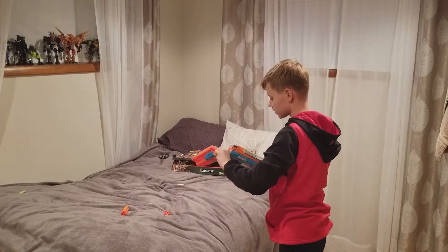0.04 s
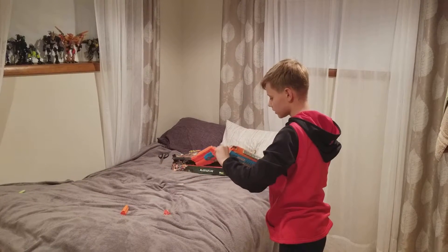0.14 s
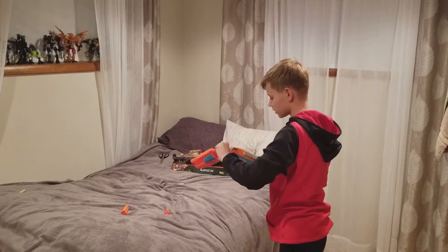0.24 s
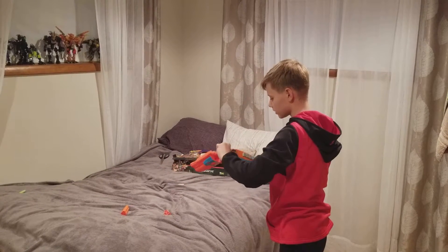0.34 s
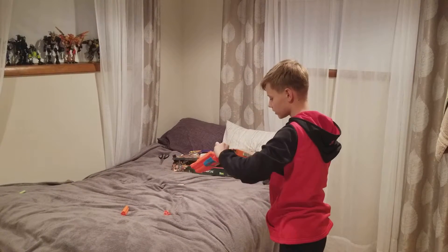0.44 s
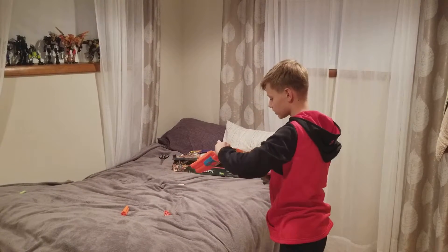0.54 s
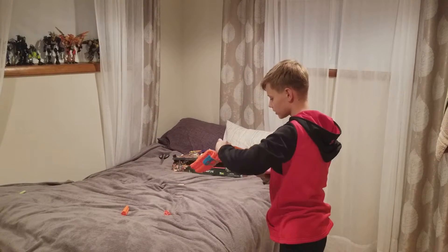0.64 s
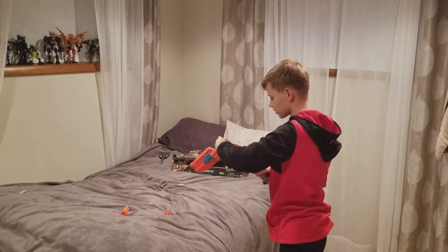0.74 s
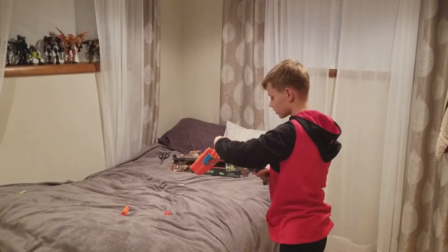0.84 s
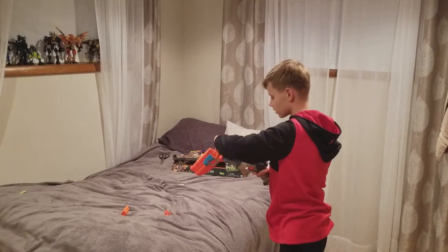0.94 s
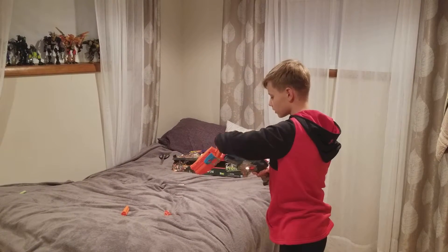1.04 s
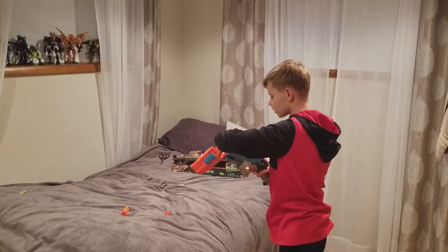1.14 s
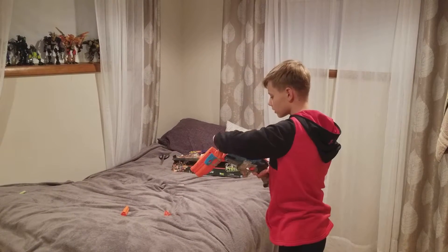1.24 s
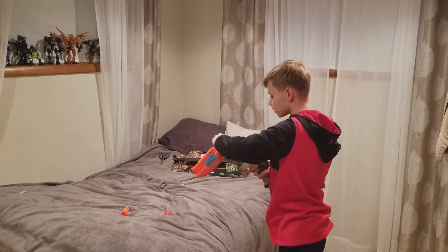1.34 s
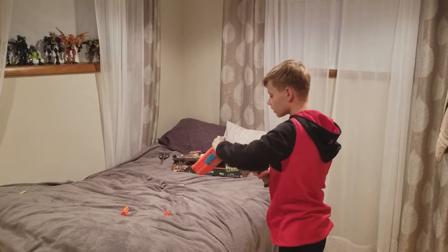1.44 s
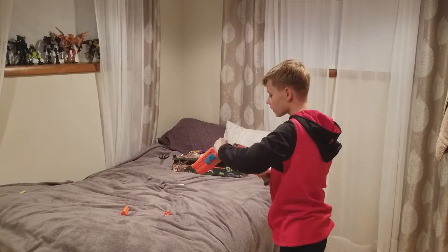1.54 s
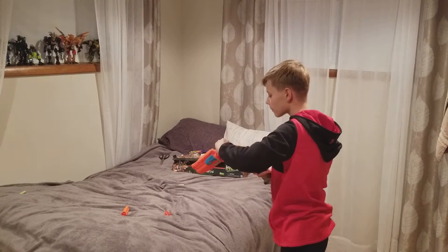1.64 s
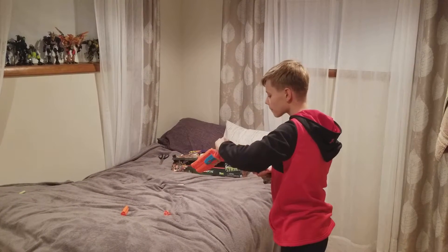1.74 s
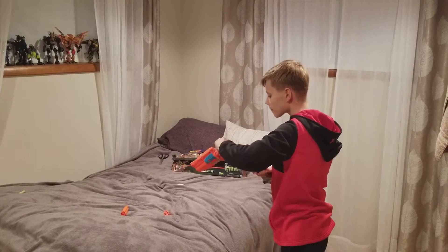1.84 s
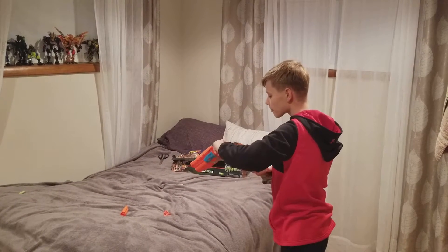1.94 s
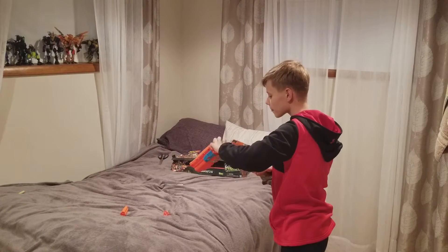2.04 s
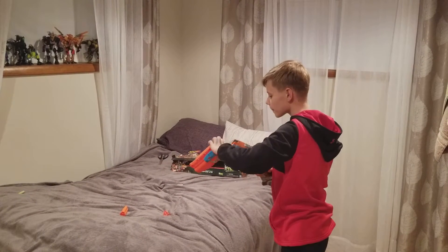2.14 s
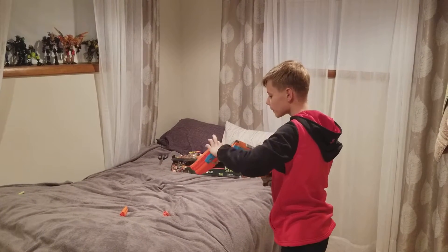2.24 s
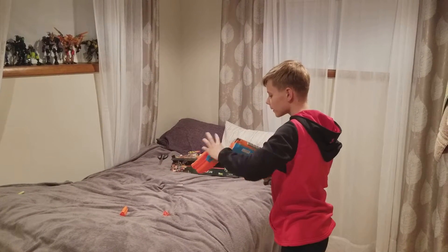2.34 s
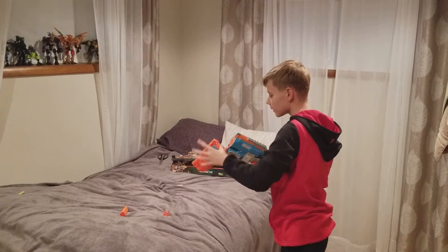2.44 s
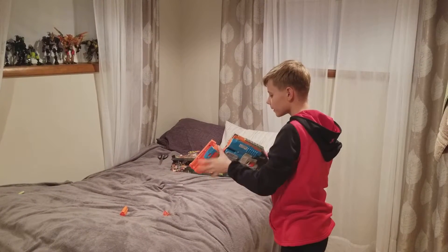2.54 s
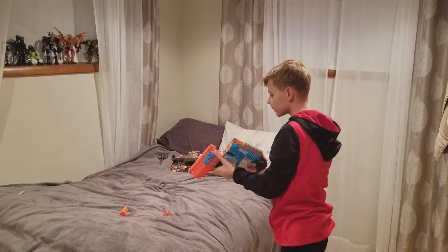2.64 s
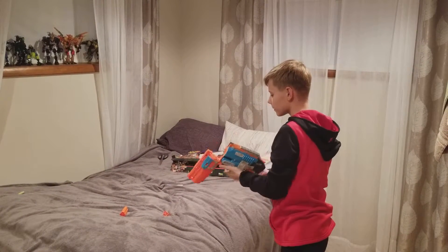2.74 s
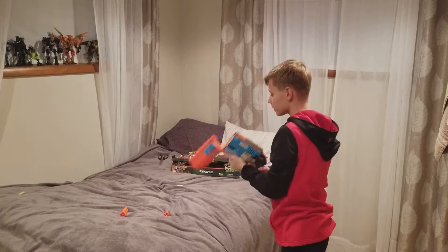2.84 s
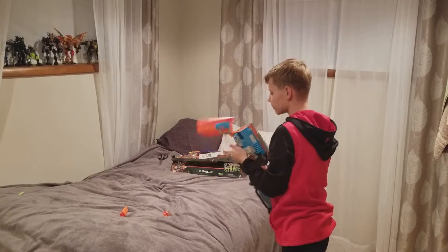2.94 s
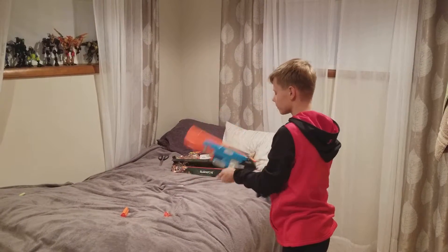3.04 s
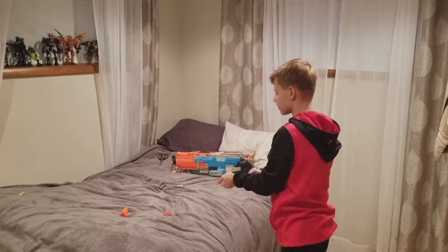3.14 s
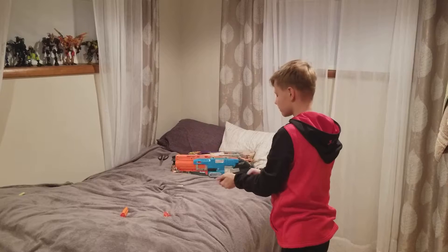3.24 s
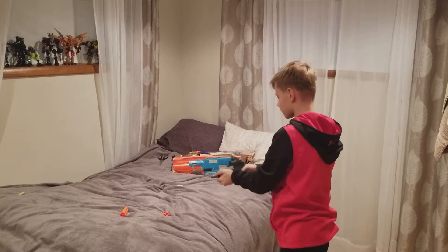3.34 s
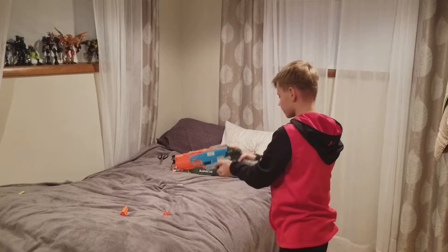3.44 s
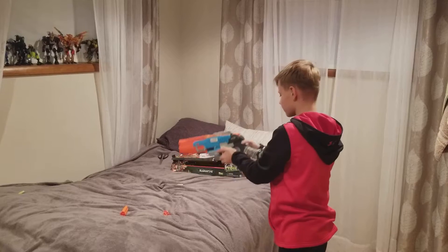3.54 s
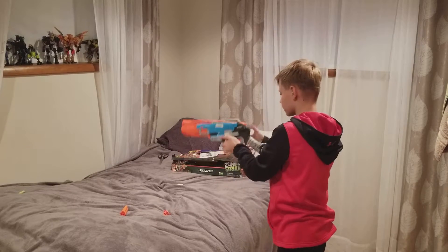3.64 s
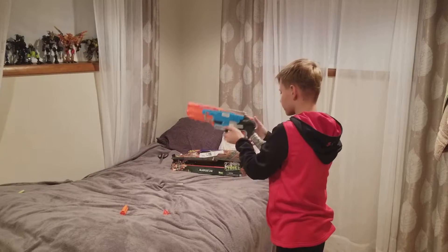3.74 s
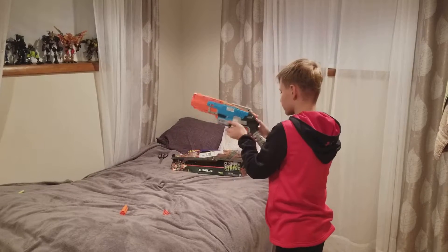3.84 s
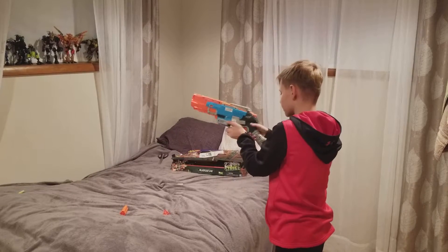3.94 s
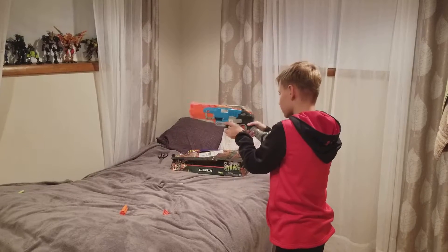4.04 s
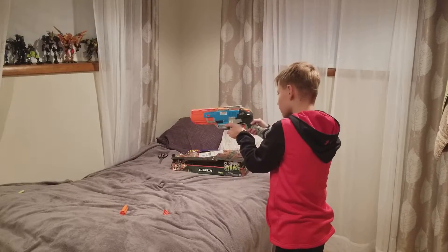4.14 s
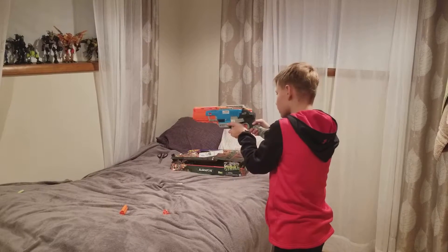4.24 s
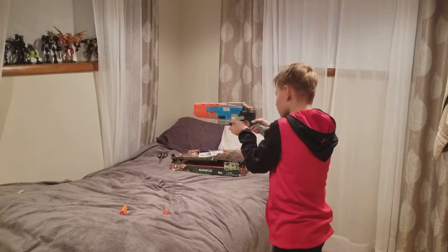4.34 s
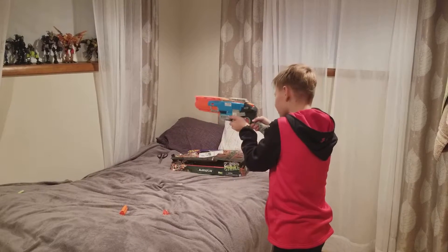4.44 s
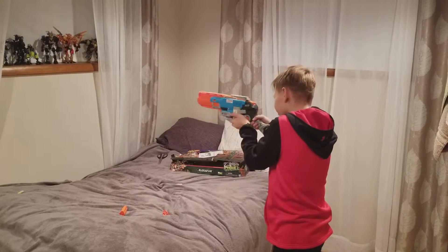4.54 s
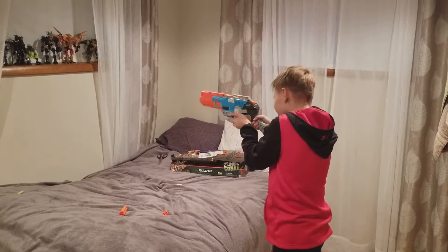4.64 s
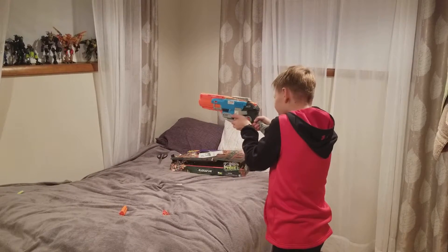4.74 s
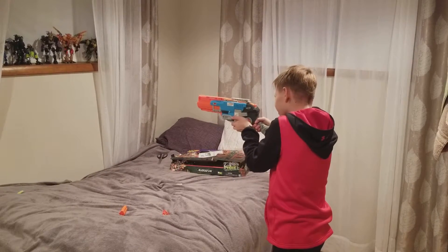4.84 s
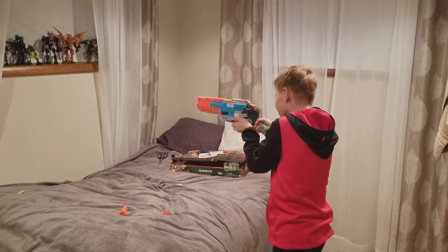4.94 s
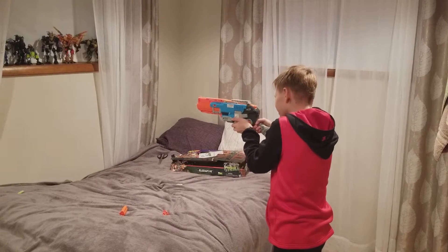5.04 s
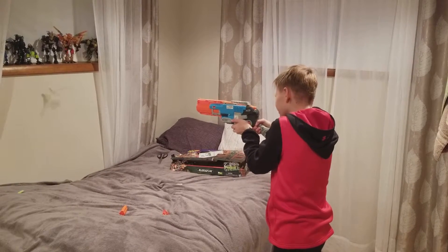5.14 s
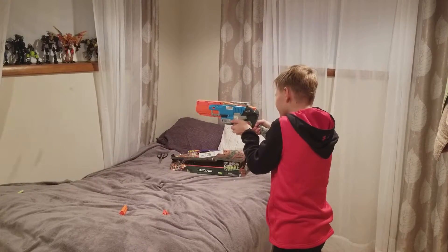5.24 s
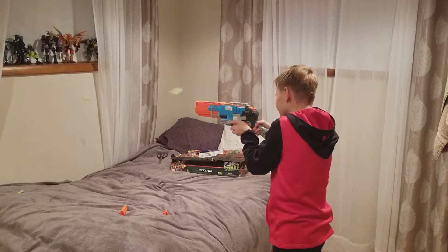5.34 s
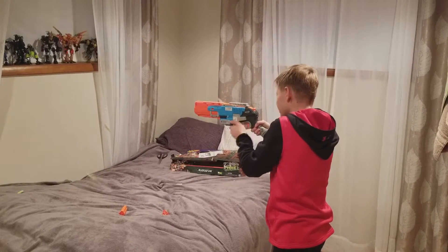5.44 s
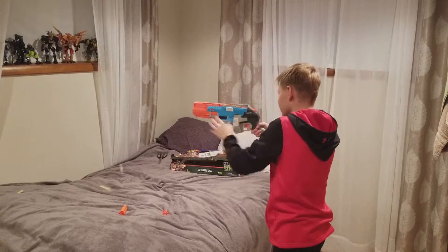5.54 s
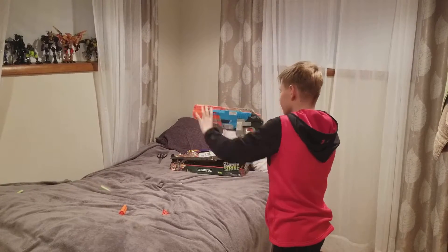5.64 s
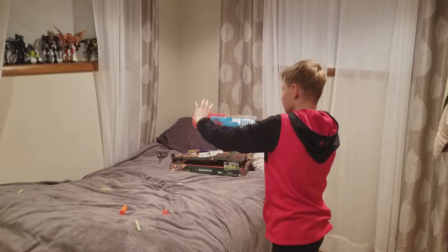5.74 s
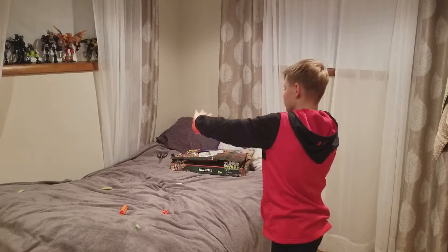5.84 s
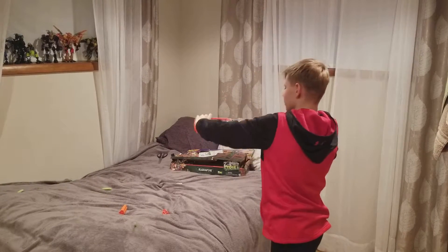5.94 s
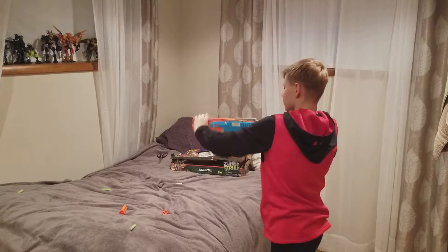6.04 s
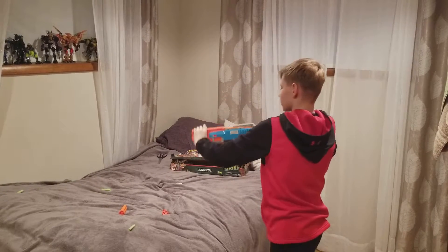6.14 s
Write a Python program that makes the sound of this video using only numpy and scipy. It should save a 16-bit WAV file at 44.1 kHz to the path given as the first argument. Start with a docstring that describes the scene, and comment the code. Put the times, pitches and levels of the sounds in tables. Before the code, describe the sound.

A plastic toy blaster is loaded in a small bedroom, heard from a few steps away. For the first half second there are light clicks, short scrapes and a tiny squeak. Sparse ticks and double clicks follow from about 1.2 seconds, growing busier from 1.8, with sharper ones near 2.3. At 2.9 a quick rising rasp ends in a loud, hollow plastic snap at 3.0 as the slide slams home, the spring ringing faintly. A few soft clicks come between 3.8 and 4.4. At about 5.1 the blaster fires with a loud snap, a low pop of air and a brief plunger rattle. The dart smacks the wall almost at once and bounces lightly near 5.3. Faint rubbing follows, then a small click at 5.9. The blows have short room reverberation, over a faint low house rumble and thin hiss.

```python
"""In a small furnished bedroom, a spring-powered toy blaster is loaded, cocked and fired.
Impacts and stick-slip friction excite the resonances of its hollow plastic shell: parts click and rasp,
the slide slams home and the coil spring rings faintly. On release the plunger drives out a pop of air,
and the dart smacks the far wall and bounces once. Short reverberation follows the blows,
over a low house rumble and a thin hiss."""
import sys
import numpy as np
from scipy import signal
from scipy.fft import rfft, irfft
from scipy.io import wavfile
from scipy.ndimage import uniform_filter1d

SR = 44100
rng = np.random.default_rng(int(sys.argv[2]) if len(sys.argv) > 2 else 0)


def store_pcm(level_fs):
    """Save levels as 16-bit WAV."""
    pcm = np.round(np.clip(level_fs, -1, 1) * 32767).astype(np.int16)
    wavfile.write(sys.argv[1], SR, np.atleast_2d(pcm).T)


N = 272979
TAPS = 16384  # length of the grid on which responses are built
HZ, T = np.fft.rfftfreq(TAPS, 1 / SR), np.arange(TAPS) / SR


def amp(db):
    """Amplitude ratio of a level in decibels."""
    return 10 ** (np.asarray(db) / 20)


def curve(points, hz):
    """Linear interpolation on a logarithmic frequency axis."""
    point_hz, value = np.transpose(points)
    return np.interp(np.log(hz + 1), np.log(point_hz + 1), value)


def placed(sound, start_s, level_db):
    """Short-time level: a stereo track holding the sound, its loudest 20 ms at the given rms."""
    peak_power = uniform_filter1d((sound ** 2).mean(0), 880, mode="constant").max()
    track = np.zeros((2, N))
    span = track[:, max(round(start_s * SR), 0):][:, :sound.shape[1]]
    span += amp(level_db) * sound[:, :span.shape[1]] / np.sqrt(peak_power)
    return track


def resonance(pitch_hz, width_hz, gain_db):
    """A damped mode makes a Lorentzian peak in the spectrum."""
    return amp(gain_db) / (1 + ((HZ - pitch_hz) / (width_hz / 2)) ** 2)


def response(colour, modes):
    """Modal superposition: an object's peaks stand on its broad spectral envelope."""
    return amp(curve(colour, HZ)) * (1 + sum(resonance(*mode) for mode in modes))


def contact(body_db, bright_db):
    """Excitation spectrum: heavy contacts drive the low range, hard ones the treble."""
    return amp(curve([(700, body_db), (2200, 0), (7000, bright_db)], HZ))


def ringing(gain):
    """Minimum phase: the Hilbert transform of log gain yields a causal impulse response."""
    log_gain = np.log(np.maximum(np.r_[gain, gain[-2:0:-1]], 1e-5))
    spectrum = np.exp(np.conj(signal.hilbert(log_gain)))
    return np.fft.ifft(spectrum).real[:TAPS // 2]


# likeness of the sound field at the two microphones: frequency_hz, correlation_ratio
COHERENCE = [(100, 0.98), (200, 0.9), (350, 0.92), (650, 0.2), (1200, .15), (5000, .1)]
def stereo_noise(hz):
    """Spatial coherence: two random spectra, alike in the bass and nearly unrelated in the treble."""
    a, b, c, d = rng.standard_normal((4, len(hz)))
    left, independent = a + 1j * b, c + 1j * d
    likeness = np.clip(curve(COHERENCE, hz), -1, 1)
    return np.array([left, likeness * left + np.sqrt(1 - likeness ** 2) * independent])


# reverberation time of the bedroom: frequency_hz, t60_s
ROOM_DECAY = [(100, .36), (300, 0.25), (700, 0.28), (1500, 0.27), (3500, .26), (7000, 0.25), (14000, 0.26)]
def in_room(sound, direct_db, t60_scale=1, early_db=3, early_s=0.0029):
    """Reverberation: direct sound, early reflections and a diffuse tail decaying band by band."""
    centres_hz, t60s = np.transpose(ROOM_DECAY)
    noise = stereo_noise(HZ)
    room = np.zeros((2, TAPS))
    for pick, t60_s in zip(np.eye(len(t60s)), t60s):
        band = irfft(noise * np.interp(np.log(HZ + 1), np.log(centres_hz), pick))
        room += band * np.exp(-np.log(1000) * T / (t60_s * t60_scale))
    room *= 1 + amp(early_db) * np.exp(-T / early_s)
    room /= np.linalg.norm(room[0])
    room[:, 0] += amp(direct_db)
    return signal.fftconvolve(sound[None], room, axes=1)


def chatter(settle_s, chatter_db, count=10):
    """Contact bounce: one impulse, then the dwindling re-contacts of loose parts settling."""
    delays_s = settle_s * (np.arange(count) + rng.random(count)) * 2 / count
    sizes = rng.choice([-1, 1], count) * amp(chatter_db) * np.exp(-delays_s / settle_s)
    force = np.zeros(TAPS // 8)
    force[np.minimum(delays_s * SR, len(force) - 1).astype(int)] = sizes
    force[0] = 1
    return force


def impact(blow, gain, direct_db, settle_s, chatter_db, t60_scale):
    """Impact excitation: the contact force is convolved with the object's impulse response."""
    start_s, level_db, body_db, bright_db = blow
    ring = ringing(gain * contact(body_db, bright_db))
    knock = signal.fftconvolve(chatter(settle_s, chatter_db), ring)
    return placed(in_room(knock, direct_db, t60_scale), start_s, level_db)


# spectra of the house rumble and of the hiss: frequency_hz, relative_density_db
RUMBLE_SPECTRUM = [(15, -41), (28, -24), (50, -2), (62, -3.5), (75, -1), (95, -2), (130, -8), (200, -15),
                   (260, -12), (340, -23.5), (450, -31.5), (700, -37.5), (1200, -60.5)]
HISS_SPECTRUM = [(300, 10), (1000, 3.5), (2500, 0), (6000, -6), (12000, -6), (16000, -9)]
# the background level dips after the loud snaps: time_s, gain_db
BACKGROUND_LEVEL = [(0, 3), (1.5, 2), (2.95, 3), (3.2, -4.5), (3.95, -6.5), (4.4, 0.5), (5.0, 1),
                    (5.449, -1.5), (6.19, -0.5)]
def background(rumble_db=-57, hiss_db=-75.5):
    """Spectrally shaped noise: house rumble and thin hiss share one slow envelope."""
    hz = np.fft.rfftfreq(N, 1 / SR)
    out = np.zeros((2, N))
    for spectrum, level_db in (RUMBLE_SPECTRUM, rumble_db), (HISS_SPECTRUM, hiss_db):
        noise = irfft(stereo_noise(hz) * amp(curve(spectrum, hz)), N)
        out += amp(level_db) * noise / np.sqrt(np.mean(noise ** 2))
    return out * amp(np.interp(np.arange(N) / SR, *np.transpose(BACKGROUND_LEVEL)))


# spectral envelope of the front parts that the hand works: frequency_hz, gain_db
FRONT_COLOUR = [(60, -37), (150, -22), (300, -13), (450, -8.5), (620, -3), (1000, -5.5), (1700, 1),
                (3000, -3.5), (4100, -8.5), (5000, -11), (7500, -19.5), (13000, -23), (16000, -26.5)]
# their resonances: pitch_hz, width_hz, gain_db
FRONT_RESONANCES = [(585, 180, -2), (770, 70, -6.5), (1046, 140, -1.5), (1770, 210, -7), (2670, 110, -9),
                    (2970, 110, -6.5), (4140, 150, -6.5), (5590, 110, -7), (8130, 380, -4)]
FRONT_GAIN = response(FRONT_COLOUR, FRONT_RESONANCES)
# small parts meeting the shell: start_s, level_db, body_db, bright_db, pitch_hz
PART_CLICKS = [(0.001, -45, 5, -12.5, 1000), (0.204, -42.5, -11, -3.5, 2300), (0.3492, -42.5, 1, 11, 4400),
               (0.403, -39.5, 0.5, -1, 2150), (0.594, -67.5, -2, 6, 2950), (0.772, -61.5, 0, -27, 1100),
               (1.072, -66, -11, 1, 2850), (1.861, -46.5, -1, 11, 3300), (2.068, -47.5, 19, -6, 690),
               (2.119, -47, -8.5, -12.5, 2000), (2.240, -47.5, 6, -10, 1900), (2.357, -29.5, 4, 8, 780),
               (2.529, -41, -2.5, -4.5, 2900), (2.613, -58, 8, -20, 800), (2.788, -57.5, 5, -20.5, 1700),
               (2.899, -51.5, 8, -18, 700), (2.951, -43, 5, -11, 750), (3.403, -65.5, 0, -31, 1800),
               (3.8145, -49, -6.5, -10, 2100), (4.031, -52.5, -9.5, -11, 2100),
               (4.0945, -44.5, -5.5, -11, 1300), (4.396, -54.5, 13, -4, 660), (5.839, -62.5, 12, 4, 1900),
               (5.891, -42, 9, 2, 620)]
def clicks(rows=PART_CLICKS, width_ratio=0.25, ring_db=-1.5, settle_s=0.007, chatter_db=0):
    """Local resonance: a click rings the whole front, and most strongly the part it comes from."""
    out = np.zeros((2, N))
    for *blow, pitch_hz in rows:
        gain = FRONT_GAIN * (1 + resonance(pitch_hz, width_ratio * pitch_hz, ring_db))
        out += impact(blow, gain, direct_db=-19.5, settle_s=settle_s, chatter_db=chatter_db,
                      t60_scale=0.88)
    return out


# plastic sliding on plastic: start_s, end_s, level_db, body_db, bright_db, swell_db
SLIDING_STROKES = [(0.043, 0.125, -51, 16, -18, 4), (0.205, 0.267, -46, 0, 1.5, -7),
                   (0.28, 0.338, -46.5, 4.5, 7, -4), (0.419, 0.515, -50.5, 11.5, 3.5, 5.5),
                   (1.169, 1.24, -51, 1.5, -3, 18), (1.779, 1.85, -46.5, -6, -11, 8),
                   (1.845, 1.90, -38, -1, 2, 10), (2.131, 2.224, -47.5, 4, -9, -4.5),
                   (2.251, 2.312, -54.5, 7, -10, 12), (2.515, 2.56, -43.5, 0, -5.5, -2),
                   (2.905, 3, -30, 2, -12, 32), (3.833, 3.90, -57, -0.5, -5, -3),
                   (5.32, 5.38, -61, 5, -15, 5), (5.45, 5.56, -68.5, 12, -8, -6),
                   (5.66, 5.735, -62.5, 6.5, 4.5, 0)]
def friction(strokes=SLIDING_STROKES, slips_per_s=1300, spread_db=4, grip_s=0.011):
    """Stick-slip friction: sliding parts move in tiny uneven jerks that ring the front."""
    out = np.zeros((2, N))
    for start_s, end_s, level_db, body_db, bright_db, swell_db in strokes:
        length = int(np.clip((end_s - start_s) * SR, 100, TAPS))
        sizes = rng.choice([-1, 1], TAPS) * amp(spread_db * np.minimum(rng.exponential(1, TAPS), 3))
        slips = sizes * (rng.random(TAPS) < slips_per_s / SR)
        grip = signal.windows.tukey(length, 2 * grip_s * SR / length)
        force = slips[:length] * grip * amp(np.linspace(0, swell_db, length))
        rasp = signal.fftconvolve(force, ringing(FRONT_GAIN * contact(body_db, bright_db)))
        out += placed(in_room(rasp, direct_db=-6.5, t60_scale=0.73), start_s, level_db)
    return out


# double clicks of the catches: start_s, level_db, body_db, bright_db, pitch_hz, second_click_gain_db
CATCH_CLICKS = [(0.1412, -39, -0.5, -9.5, 2360, 0), (1.2400, -39, 6, -3.5, 1500, -7.5),
                (1.357, -47, 7, 0, 980, 0.5), (1.542, -50.5, 5.5, -6, 1640, 10),
                (1.9416, -37, 0.5, 12.5, 3580, -9), (2.3131, -31, -2, 1.5, 2790, 4)]
def catches(gap_s=0.0387, bright_db_per_db=0.5):
    """Ratchet action: a pawl rings as it rides onto its tooth, scrapes across and drops in."""
    rides, scrapes, drops = [], [], []
    for start_s, level_db, body_db, bright_db, pitch_hz, second_db in CATCH_CLICKS:
        drop_s = start_s + gap_s
        scrape_db = level_db + min(second_db, 0) - 6  # below the weaker click
        drop_bright_db = bright_db + bright_db_per_db * second_db  # stronger is brighter
        rides.append((start_s, level_db, body_db, bright_db, pitch_hz))
        scrapes.append((start_s, drop_s, scrape_db, body_db, bright_db - 3, 0))
        drops.append((drop_s, level_db + second_db, body_db, drop_bright_db, pitch_hz))
    return (clicks(rides, width_ratio=0.27, ring_db=7, settle_s=0.009, chatter_db=2.5)
            + clicks(drops, width_ratio=0.35, ring_db=-5.5, settle_s=0.007, chatter_db=-1)
            + friction(scrapes))


def squeak(start_s=0.363, level_db=-42, body_db=10, bright_db=10):
    """One dominant treble resonance: a tight part chirps as it is pushed in."""
    gain = FRONT_GAIN * (0.5 + resonance(pitch_hz=3700, width_hz=600, gain_db=26))
    return impact((start_s, level_db, body_db, bright_db), gain,
                  direct_db=-19, settle_s=0.008, chatter_db=-1, t60_scale=0.98)


# spectral envelope of the main shell: frequency_hz, gain_db
SHELL_COLOUR = [(60, -33.5), (150, -25.5), (300, -11.5), (450, -3.5), (650, -1), (1000, -2.5), (2000, -0.5),
                (3000, -3.5), (4100, -8), (5000, -9.5), (7500, -16), (13000, -17), (16000, -26.5)]
# its resonances: pitch_hz, width_hz, gain_db
SHELL_RESONANCES = [(193, 13, 7.5), (323.3, 13, 0.5), (613.6, 91, 4), (658, 23, -0.5), (750, 45, -0.5),
                    (966, 33, -3.5), (1048, 100, 1), (1696, 94, -1.5), (2030, 80, 2), (1950, 40, -2),
                    (2117, 80, 1.5), (2580, 40, -5), (3020, 50, -3.5), (3790, 32, 4.5), (4130, 67, 4),
                    (6180, 200, -2)]
SHELL_GAIN = response(SHELL_COLOUR, SHELL_RESONANCES)
# the slide slams home, then the sear frees the spring: start_s, level_db, body_db, bright_db
SHELL_SLAMS = [(2.9973, -12, -1.5, -2), (5.0700, -18.5, 3, 3)]
def slams(lead_s=0.008, rebound_s=0.0122, loss_db=4):
    """Inelastic collision: a lighter, thinner first touch, the full blow, then two weaker rebounds."""
    blows = []
    for start_s, level_db, body_db, bright_db in SHELL_SLAMS:
        blows.append((start_s - lead_s, level_db - 2.5, body_db - 2, bright_db + 1))
        blows += [(start_s + k * rebound_s, level_db - k * loss_db, body_db, bright_db)
                  for k in range(3)]
    return sum(impact(blow, SHELL_GAIN, direct_db=-15.5, settle_s=0.006, chatter_db=-6, t60_scale=0.76)
               for blow in blows)


# spectral envelope of the coil spring: frequency_hz, gain_db
COIL_COLOUR = [(200, -30), (620, -3.5), (1000, -7), (2100, 0), (3000, -6.5), (4200, -14.5), (6000, -30),
               (16000, -51.5)]
# its clusters of modes: pitch_hz, width_hz, gain_db
COIL_RESONANCES = [(630, 80, 1.5), (1970, 84, 6), (2750, 250, -1.5), (3980, 200, 1)]
# jolts that shake it: start_s
COIL_JOLTS = [2.997, 5.07]
def spring(level_db=-54, t60_s=1.0):
    """Modal overlap: the close modes of the jolted steel coil blur into a faint decaying buzz."""
    coil = ringing(response(COIL_COLOUR, COIL_RESONANCES))
    decay = np.exp(-np.log(1000) * np.arange(SR) / SR / t60_s)
    out = np.zeros((2, N))
    for start_s in COIL_JOLTS:
        shiver = rng.standard_normal((2, SR)) * decay
        out += placed(signal.fftconvolve(shiver, coil[None], axes=1), start_s, level_db)
    return out


def stock_thud(start_s=3.008, level_db=-31, body_db=-3, bright_db=-7):
    """Hollow-body resonance: the stock's low mode sounds as the slide lands."""
    gain = SHELL_GAIN * (1 + resonance(pitch_hz=186, width_hz=44, gain_db=29))
    return impact((start_s, level_db, body_db, bright_db), gain,
                  direct_db=-12, settle_s=0.006, chatter_db=-8, t60_scale=0.5)


# spectral envelope of the air leaving the barrel: frequency_hz, gain_db
AIR_COLOUR = [(30, -38), (70, -14.5), (95, -9), (120, 0.5), (170, -2), (260, -1), (400, -19), (700, -16),
              (950, -25), (2000, -32.5), (8000, -55.5)]
def air_pop(start_s=5.0678, level_db=-15):
    """A pressure pulse: one shove of air leaves the barrel and booms briefly in the room."""
    boom_modes = [(119, 14, -1), (154, 28, -1)]  # pitch_hz, width_hz, gain_db
    boom = ringing(response(AIR_COLOUR, boom_modes))
    return placed(in_room(boom, direct_db=10.5, t60_scale=0.41), start_s, level_db)


# spectral envelope of the plunger in its tube: frequency_hz, gain_db
PLUNGER_COLOUR = [(60, -31), (130, -16), (200, -2.5), (300, 2.5), (450, -2.5), (750, -4), (950, -15.5),
                  (2000, -21), (8000, -42.5)]
# its resonances: pitch_hz, width_hz, gain_db
PLUNGER_RESONANCES = [(206, 25, 1.5), (384, 52, 0.5), (457, 26, 0), (512, 42, -0.5), (665, 54, -4),
                      (770, 40, -3.5)]
def plunger(start_s=5.0715, level_db=-18, rebound_s=0.005, restitution=0.91, jitter=0.2, count=6):
    """Restitution: the plunger bottoms out and rebounds on its spring in weakening knocks."""
    gaps_s = rebound_s * np.exp(jitter * rng.standard_normal(count))
    onsets = ((np.cumsum(gaps_s) - gaps_s[0]) * SR).astype(int)
    knocks = np.zeros(TAPS)
    knocks[onsets] = restitution ** np.arange(count) * rng.choice([-1, 1], count)
    rattle = signal.fftconvolve(knocks, ringing(response(PLUNGER_COLOUR, PLUNGER_RESONANCES)))
    return placed(in_room(rattle, direct_db=3.5), start_s, level_db)


# spectral envelope of the struck wall: frequency_hz, gain_db
WALL_COLOUR = [(60, -19.5), (110, -13), (300, -8.5), (450, -6.5), (700, -6.5), (1100, -2), (1800, -4.5),
               (2700, -5.5), (4200, -12), (5500, -16), (9000, -20.5), (16000, -23.5)]
# its resonances: pitch_hz, width_hz, gain_db
WALL_RESONANCES = [(190, 35, -1.5), (297, 27, 8.5), (610, 58, -1), (837, 52, 0.5), (1200, 54, -4.5),
                   (1380, 47, -5), (1660, 180, -0.5), (1955, 75, -0.5), (2220, 29, -5), (3740, 32, 1.5),
                   (3890, 45, 4), (8100, 240, -6.5)]
# the dart's contacts: start_s, level_db, body_db, bright_db, pitch_hz, ring_db
DART_IMPACTS = [(5.1428, -19, -3.5, 5, 1710, -3.5), (5.1468, -15.5, -2.5, -2.5, 1470, 0.5),
                (5.162, -20.5, -3, 3, 3693, -4.5), (5.2599, -35.5, -13.5, 4.5, 1330, 7)]
def dart(width_ratio=0.14):
    """Point excitation: each hit rings the wall's modes and a resonance of the spot it lands on."""
    wall = response(WALL_COLOUR, WALL_RESONANCES)
    out = np.zeros((2, N))
    for *blow, pitch_hz, ring_db in DART_IMPACTS:
        gain = wall * (1 + resonance(pitch_hz, width_ratio * pitch_hz, ring_db))
        out += impact(blow, gain, direct_db=-12.5, settle_s=0.0033, chatter_db=-11, t60_scale=0.81)
    return out


def scene():
    """Superposition: loading, cocking, the shot and the dart's landing add to the background."""
    loading = clicks() + catches() + friction() + squeak()
    snaps = slams() + stock_thud() + spring()
    shot = air_pop() + plunger() + dart()
    return loading + snaps + shot + background()


# microphone colour, added on the left and subtracted on the right: frequency_hz, gain_db
LEFT_BIAS = [(100, 0.33), (200, -1.1), (350, 2), (1000, -0.5), (2200, 1), (5000, 0.5), (14000, 0)]
def record(dry, cutoff_hz=16150):
    """Transduction: two unequally coloured microphones, soft saturation, then a band limit."""
    bias_db = curve(LEFT_BIAS, np.fft.rfftfreq(N, 1 / SR))
    coloured = irfft(rfft(dry) * amp([bias_db, -bias_db]), N)
    saturated = coloured / (1 + coloured ** 6) ** (1 / 6)
    lowpass = signal.firwin(401, cutoff_hz, window=("kaiser", 9), fs=SR)
    return signal.oaconvolve(saturated, lowpass[None], "same", axes=1)


dry = scene()
out = record(dry)
store_pcm(out)
```